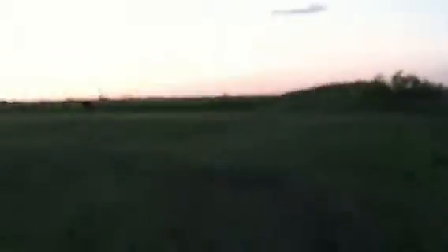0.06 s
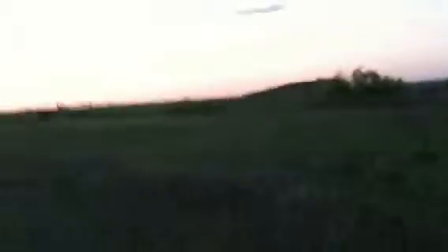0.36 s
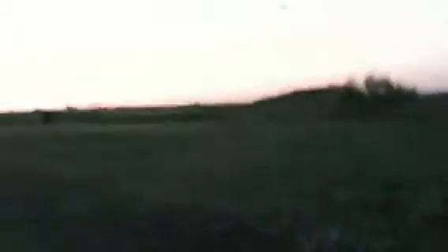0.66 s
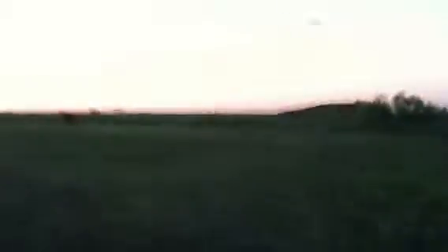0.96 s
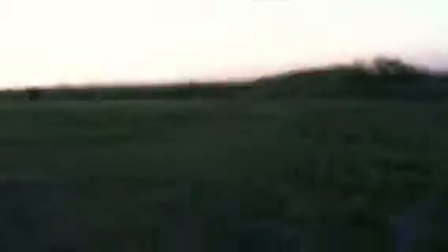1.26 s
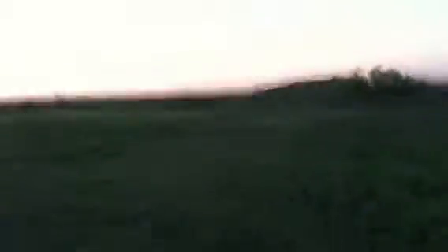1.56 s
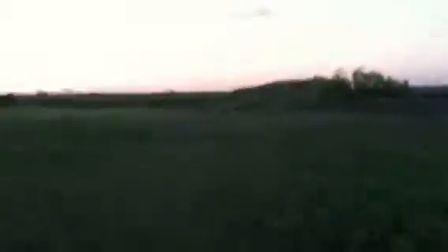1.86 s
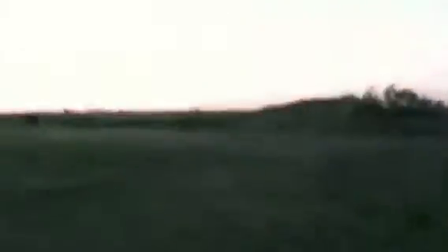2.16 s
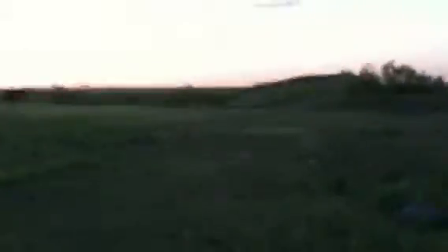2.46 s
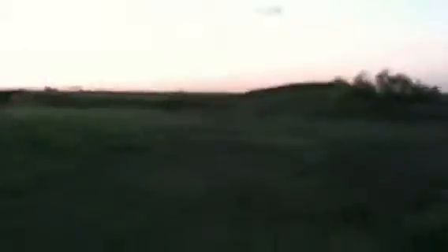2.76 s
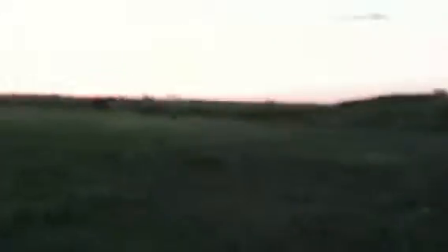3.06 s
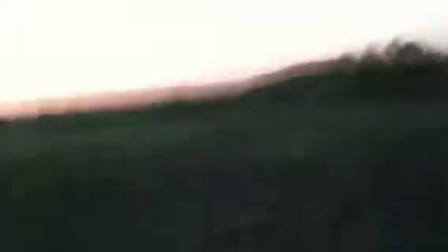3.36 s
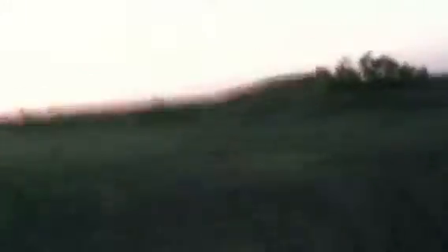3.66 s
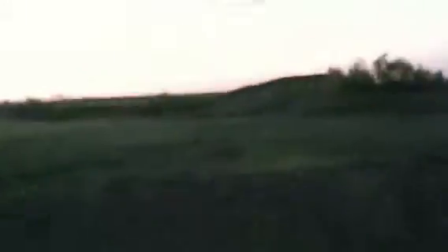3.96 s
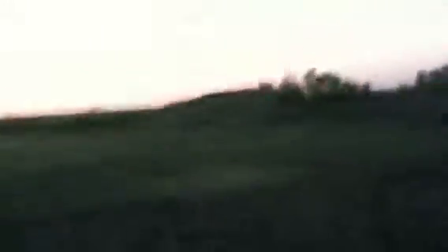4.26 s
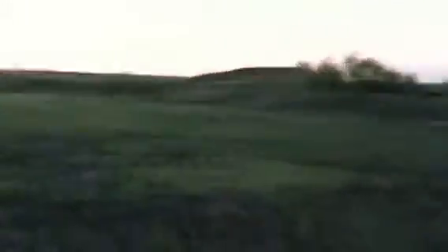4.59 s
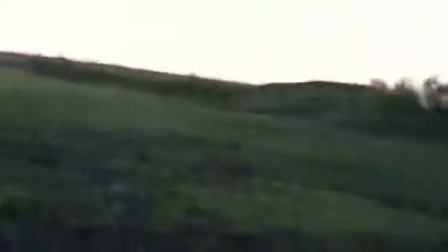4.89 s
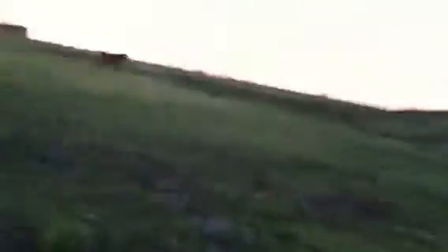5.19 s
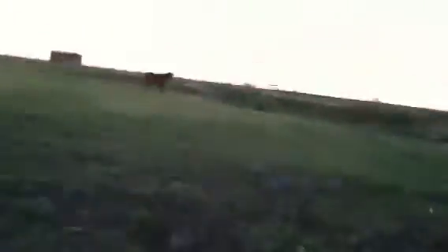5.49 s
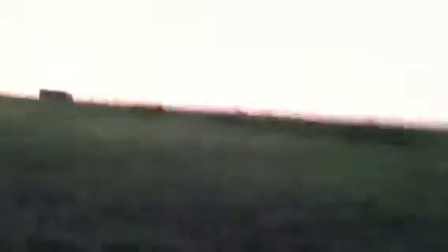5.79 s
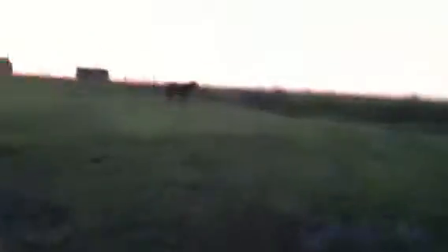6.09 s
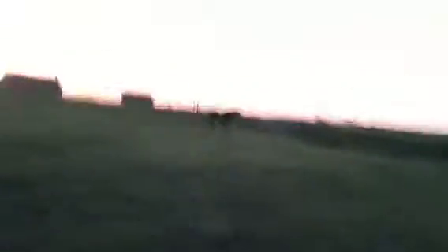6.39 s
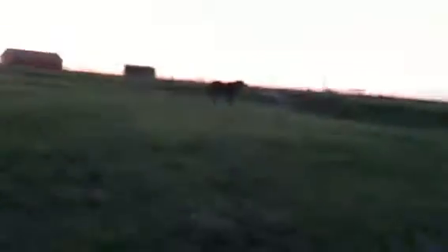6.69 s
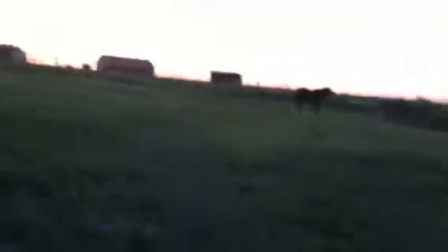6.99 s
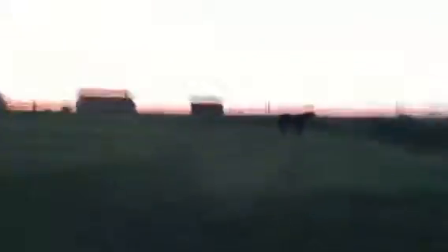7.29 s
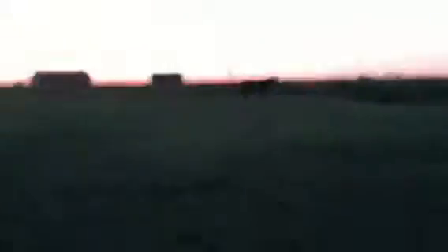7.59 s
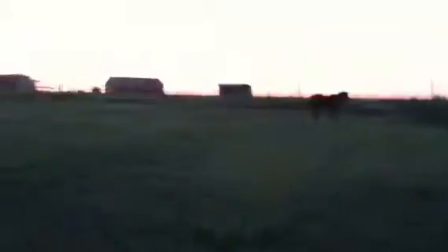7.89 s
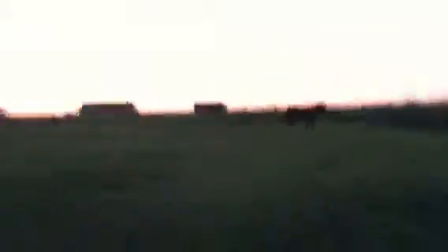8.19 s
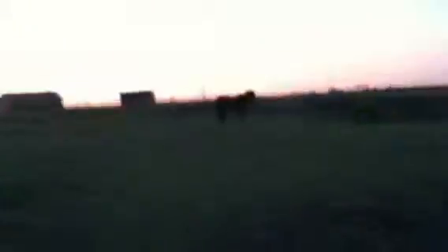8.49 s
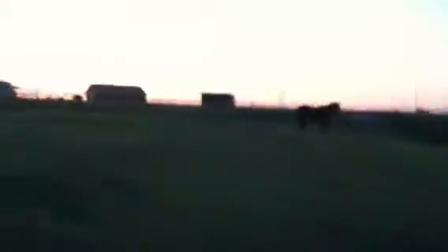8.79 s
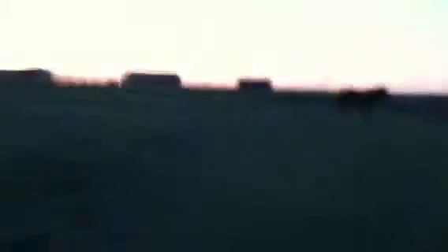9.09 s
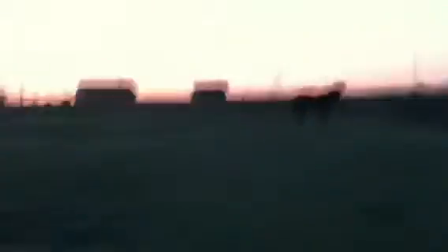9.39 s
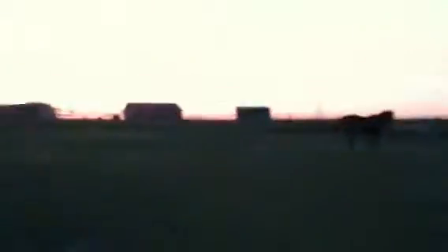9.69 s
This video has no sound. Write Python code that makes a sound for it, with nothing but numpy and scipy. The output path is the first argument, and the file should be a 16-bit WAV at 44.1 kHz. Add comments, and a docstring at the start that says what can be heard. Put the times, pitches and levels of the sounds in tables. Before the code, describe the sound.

Irregular plastic clacks and short, dull thumps run throughout as a bicycle jolts quickly across rough turf. A soft tyre rumble and light chain rattle lie beneath them, swelling a little before halfway. Some blows ring with a hollow knock, and one small metal part pings faintly shortly before the end. The microphone sits on the handlebar, so everything sounds close and dry, without echo.

```python
"""A mountain bike rides fast over bumpy grass, heard by a small camera on its handlebar. From the start the
tyres rustle and the chain jiggles, while each bump sets the springy mount swinging with a thump and throws its
loose plastic parts against their stops; about half the blows bounce back. After the first second, occasional
blows also ring a hollow note of the mount, each at its own pitch between about 800 and 1500 Hz. Near four
seconds the rolling grows a little louder, and near the end one small metal part pings."""
import sys
import numpy as np
from scipy import signal
from scipy.fft import rfft, irfft
from scipy.io import wavfile

SR = 44100
rng = np.random.default_rng(int(sys.argv[2]) if len(sys.argv) > 2 else 0)


def store_wav(level_fs):
    """Save 16-bit WAV to argv[1]."""
    pcm = np.round(np.clip(np.atleast_2d(level_fs), -1, 1) * 32767)
    wavfile.write(sys.argv[1], SR, pcm.T.astype(np.int16))


N = 434385

# Bumps in the ground. Each row: time in seconds, relative level of the loose parts' clack in dB,
# relative level of the mount's thump in dB.
BUMPS = [(0.038, -31.5, -27.5), (0.075, -20, -19), (0.208, -27.5, -30), (0.279, -30.5, -29),
         (0.317, -19.5, -24), (0.344, -38, -21.5), (0.387, -20.5, -17), (0.412, -25, -27),
         (0.448, -49, -20), (0.458, -26, -26), (0.518, -44, -20), (0.607, -34, -30), (0.645, -21, -15),
         (0.75, -32.5, -25), (0.824, -20.5, -24.5), (0.854, -26.5, -20.5), (0.931, -18.5, -19.5),
         (1.022, -29, -33), (1.039, -31.5, -28), (1.138, -23, -20), (1.162, -27.5, -26),
         (1.191, -59, -21.5), (1.206, -19.5, -16), (1.26, -36, -28), (1.39, -28.5, -30),
         (1.417, -20, -12.5), (1.466, -28, -29), (1.482, -34.5, -22), (1.687, -20, -16.5),
         (1.736, -34.5, -23.5), (1.821, -28.5, -31), (1.888, -41, -22.5), (1.911, -33.5, -30),
         (1.942, -24, -24), (1.97, -30, -27), (2.0, -26.5, -39), (2.01, -17, -19), (2.098, -31, -23.5),
         (2.199, -32, -23.5), (2.25, -19, -16.5), (2.349, -40, -40), (2.489, -27.5, -30),
         (2.513, -28.5, -26), (2.527, -34, -22), (2.584, -24.5, -27.5), (2.68, -36.5, -24.5),
         (2.704, -32.5, -25), (2.754, -35, -19.5), (2.777, -17.5, -12.5), (2.834, -18.5, -16.5),
         (2.907, -22.5, -17), (3.006, -25, -24), (3.047, -30.5, -37), (3.114, -35, -15), (3.14, -25, -21),
         (3.187, -30.5, -30), (3.232, -30, -20), (3.379, -30, -22.5), (3.509, -24, -28), (3.536, -20, -25),
         (3.548, -22, -13), (3.579, -15.5, -20), (3.674, -31, -28), (3.79, -22, -14.5), (3.847, -39, -13.5),
         (3.876, -28, -30), (3.902, -30, -28), (3.953, -17, -12), (4.006, -23, -16), (4.137, -23, -14.5),
         (4.156, -22, -12), (4.182, -26, -48), (4.249, -21, -15), (4.415, -28.5, -21.5), (4.448, -22, -27),
         (4.492, -21.5, -28), (4.53, -14.5, -11), (4.685, -37.5, -25), (4.801, -37, -17.5),
         (4.901, -27.5, -21.5), (4.933, -32.5, -30), (4.973, -25.5, -25), (5.011, -32, -26.5),
         (5.249, -38.5, -26), (5.454, -30.5, -29), (5.519, -34, -20), (5.549, -35, -19),
         (5.562, -23.5, -19), (5.724, -40.5, -23), (5.776, -31.5, -25), (5.832, -17, -12),
         (5.928, -53, -24), (6.016, -44, -18.5), (6.048, -24.5, -25), (6.099, -22, -34), (6.114, -53, -18),
         (6.135, -43, -34), (6.232, -32, -32), (6.282, -18.5, -15), (6.365, -35, -21.5), (6.468, -36, -26),
         (6.628, -26.5, -20.5), (6.655, -27, -31), (6.692, -19, -16.5), (6.763, -51, -24.5),
         (6.94, -18.5, -15.5), (7.009, -26, -28), (7.085, -31, -35), (7.308, -48, -19), (7.349, -51, -26),
         (7.417, -18, -11.5), (7.487, -45, -21), (7.667, -32, -27), (7.74, -35, -16.5), (7.76, -23, -27),
         (7.814, -30.5, -34), (7.851, -33, -31), (7.893, -30, -34), (7.912, -58, -22.5), (8.085, -28, -28),
         (8.099, -26, -17.5), (8.166, -39, -22), (8.277, -33.5, -28.5), (8.325, -28, -29),
         (8.35, -40, -21.5), (8.365, -28.5, -18), (8.433, -24.5, -23), (8.469, -27.5, -24.5),
         (8.655, -20, -23), (8.69, -21.5, -16.5), (8.73, -26.5, -24), (8.762, -17.5, -17.5),
         (8.803, -29, -36), (8.846, -20, -17), (8.889, -25.5, -24), (8.923, -24.5, -27),
         (8.969, -22.5, -25), (8.999, -47, -18), (9.012, -19, -19), (9.255, -15.5, -9.5),
         (9.349, -33.5, -25), (9.519, -47, -24), (9.576, -23.5, -26), (9.59, -23, -17.5),
         (9.702, -30, -26.5), (9.742, -24.5, -30), (9.758, -50, -19)]
USUAL_DB = -24  # the clack of a middling blow
KNOCK_HZ, CLACK_HZ, EDGE_HZ, RAP_HZ = (330, 1200), (1200, 3600), (4000, 14000), (330, 3600)
CUTOFF_HZ = 15700


def jolts(rebound_share=0.55, min_flight_s=0.015, mean_extra_s=0.012):
    """Inelastic rebound: after some bumps the loose parts fly back and land again, more softly."""
    s, clack_db, _ = np.transpose(BUMPS)
    chance, flight = rng.random((len(s), 2)).T
    landing_s = s + min_flight_s - mean_extra_s * np.log(1 - flight)
    strength_db = 0.29 * (clack_db - USUAL_DB) + 2.4 * rng.standard_normal(len(s))
    rebounds = np.c_[landing_s, strength_db - 36, strength_db - 35]  # columns as in BUMPS
    return np.r_[BUMPS, rebounds[chance < rebound_share]]


def clacks(s, db, scrape_lead_s=0.0051):
    """Impact noise: plastic hits its stop with a knock, a clack and an edge; harder blows are brighter."""
    knock_scatter, edge_scatter, scrape_scatter = rng.standard_normal((len(s), 3)).T
    knock_db = -24 + 0.5 * (db - USUAL_DB) + knock_scatter
    edge_db = -37 + 1.124 * (db - USUAL_DB) + edge_scatter
    scrape_db = db - 25 + 5 * scrape_scatter  # some parts scrape just before they land
    knock = strikes(KNOCK_HZ, knock_db, decay_s=0.0052, tail_db=-17.5, tail_s=0.0098,
                    grain_db=3.5, snap=3.8)
    clack = strikes(CLACK_HZ, db + 1, decay_s=0.0046, tail_db=-13, tail_s=0.0089, grain_db=6.5, snap=11.2)
    edge = strikes(EDGE_HZ, edge_db, decay_s=0.01, tail_db=0.5, tail_s=0.011, grain_db=6.5, snap=4.6)
    scrape = strikes(RAP_HZ, scrape_db, decay_s=0.0027, tail_db=-23, tail_s=0.01, grain_db=-1, snap=0)
    return placed(s, knock + clack + edge) + placed(s - scrape_lead_s, scrape)


def strikes(edges_hz, levels_db, decay_s, tail_db, tail_s, grain_db, snap=6, stick_s=0.012):
    """Contact excitation, one row a blow: faces snap together, chatter until they stick, and ring on."""
    t = np.arange(3500) / SR
    contact, grain, after = rng.standard_normal((len(levels_db), 3, len(t))).transpose(1, 0, 2)
    dying = np.exp(-t / decay_s - (t / stick_s) ** 2)
    chatter = unit_rms(contact * gain_of(grain_db * grain)) * dying + snap * (t == 0)
    tail = shell(after * np.exp(-t / tail_s))  # passes the resonances twice, so it is more hollow
    blow = unit_onsets(band(shell(chatter, spot_db=2.5), edges_hz))
    ring = unit_onsets(band(shell(tail, spot_db=2.5), edges_hz))
    return gain_of(levels_db)[:, None] * (blow + gain_of(tail_db) * ring)


def shell(drive, spot_db=0, top_hz=10600):
    """Modal resonance of the plastic: each row strikes another spot, weighting the modes by spot_db."""
    # Modes of the mount and camera shell. Each row: frequency in Hz, bandwidth in Hz, relative gain in dB.
    modes = [(315, 126, 0), (436, 317, 1), (730, 332, -0.5), (1020, 183, -3), (1428, 354, -4.5),
             (1985, 377, -4), (2656, 382, -5), (3078, 760, -10.5), (4597, 530, -16.5), (6570, 2400, -20),
             (8250, 2030, -14.5), (8860, 1710, -18)]
    weights = gain_of(spot_db * rng.standard_normal((len(drive), len(modes))))
    ring = 0
    for k, (hz, width_hz, db) in enumerate(modes):
        response = signal.lfilter(*signal.iirpeak(hz, hz / width_hz, SR), drive)
        ring += (-1) ** k * gain_of(db) * weights[:, k, None] * response
    return signal.sosfilt(signal.butter(5, top_hz, fs=SR, output="sos"), ring)


def thumps(s, db, clack_db, rest_hz=177.7, soft_hz=221.4, stiff_hz=302, swell_s=0.0025, settle_s=0.0081):
    """A nonlinear spring: a bump stiffens the mount, which swings down to its note as the clamp rubs."""
    t = np.arange(3000) / SR
    slowness, detune = rng.standard_normal((len(s), 2)).T
    stiffening_hz = 5 * (clack_db - db + 5)  # more clack for the same thump starts the swing higher
    start_hz = np.clip(soft_hz + stiffening_hz, soft_hz, stiff_hz) * np.exp(0.051 * detune)
    pitch_hz = rest_hz + (start_hz[:, None] - rest_hz) * np.exp(-(t / settle_s) ** 2)
    phase = 2 * np.pi * np.cumsum(pitch_hz, 1) / SR
    swell = t / (swell_s * np.exp(0.1 * slowness[:, None]))
    lingering = gain_of(-19) * (1 - np.exp(-swell)) * np.exp(-t / 0.0063)
    envelope = swell * np.exp(1 - swell) + lingering
    swings = -np.sqrt(2) * gain_of(db + 5.5)[:, None] * envelope * np.sin(phase)
    rubs = strikes((280, 1800), db - 14, decay_s=0.0027, tail_db=-8, tail_s=0.009, grain_db=4.5)
    motion = placed(s, swings) + lifts(s, db)
    bass_cut = signal.butter(1, 95, "high", fs=SR, output="sos")  # the thumps carry little deep bass
    return signal.sosfiltfilt(bass_cut, motion) + placed(s, rubs)


def lifts(s, db, deep_db=-9, lead_s=0.01606, swell_s=0.0025, lift_hz=210):
    """Damped oscillation: just ahead of a deep bump the mount rises with one soft swing and no clack."""
    t = np.arange(1500) / SR
    envelope = t / swell_s * np.exp(1 - t / swell_s)
    swing = -np.sqrt(2) * envelope * np.sin(2 * np.pi * lift_hz * t)
    lift_db = -9 + 3.6 * np.minimum(db - deep_db, 0)  # shallow bumps barely lift it
    return placed(s - lead_s, gain_of(lift_db)[:, None] * swing)


def tocks(relative_half_width=0.1283):
    """Narrow-band resonance: some blows ring a hollow note of the mount, each at its own pitch, inside a short,
    broad rap."""
    # Blows that ring the mount. Each row: time in seconds, relative level in dB, pitch in Hz.
    blows = [(1.209, -22, 985), (1.467, -21.5, 1420), (1.504, -25.5, 1020), (1.911, -21.5, 840),
             (2.035, -18.5, 1470), (3.88, -18.5, 825), (4.429, -28, 810), (4.556, -28.5, 830),
             (4.83, -24.5, 1020), (6.396, -27, 1020), (6.785, -30, 990), (7.417, -18, 1030),
             (7.944, -28, 1020), (8.111, -25.5, 990), (8.51, -32, 1020), (9.589, -22, 880)]
    s, db, _ = np.transpose(blows)
    raps = strikes(RAP_HZ, db - 5, decay_s=0.0064, tail_db=-28, tail_s=0.0096, grain_db=2)
    out = placed(s, raps)
    for at_s, level_db, hz in blows:
        half_width_hz = hz * relative_half_width
        build_s = 1 / (np.pi * half_width_hz)  # a narrower resonance builds more slowly
        note = strikes((hz - half_width_hz, hz + half_width_hz), [level_db - 1],
                       decay_s=0.0028, tail_db=-35, tail_s=0.0096, grain_db=8, snap=14)[0]
        add(out, at_s - build_s, note)
    return out


def ping(start_s=9.3208, onset_s=0.00041):
    """Free vibration: the inharmonic modes of a small metal part die away, each at its own rate."""
    # The part's modes. Each row: frequency in Hz, relative level in dB, time to fall 60 dB in seconds.
    partials = [(4662, -16, .066), (5647, -8, .14), (7025, 0, .08), (8726, -15, .034), (10730, -22, .051)]
    t = np.arange(SR // 5) / SR
    ring = sum(gain_of(db - 60 * t / t60) * np.sin(2 * np.pi * hz * t) for hz, db, t60 in partials)
    attack = 1 - np.exp(-t / onset_s)
    return placed([start_s], [gain_of(-31.5) * attack * ring])


def rolling():
    """Rolling noise: tyres, fork and chain rise and fall together with how hard the tyres work."""
    # The tyres' effort on the turf. Each row: time in seconds, gain in dB.
    effort = [(0.0, -42), (3.07, -40.5), (3.4, -41), (3.73, -38), (8.36, -40), (8.83, -38.5), (9.19, -41.5),
              (9.85, -39.5)]
    s, db = np.transpose(effort)
    gain = gain_of(np.interp(np.arange(N) / SR, s, db))
    tufts = gain_of(-4) * jiggle((150, 1000), per_s=60, decay_s=0.0043)  # small bumps through the fork
    chain = gain_of(-8) * jiggle((600, 9000), per_s=45, decay_s=0.0093)
    return gain * (tyres() + shaking() * (tufts + chain))


def tyres(lump_db=5.5, lumps_per_s=60):
    """Roughness excitation: the tyres rumble and swish on the turf, swelling over each tuft."""
    # Spectrum of tyres on turf. Each row: frequency in Hz, relative spectral density in dB.
    spectrum = [(25, -25), (65, -30), (150, 1), (215, 0.5), (450, -5.5), (700, -12), (1200, -28),
                (2900, -23.5), (3800, -35), (5400, -35), (7700, -36), (9600, -45), (14000, -70)]
    hz, db = np.transpose(spectrum)
    colour_db = np.interp(np.log(np.fft.rfftfreq(N, 1 / SR) + 1), np.log(hz), db)
    swish = unit_rms(irfft(rfft(rng.standard_normal(N)) * gain_of(colour_db), N))
    return gain_of(-1 + lump_db * wander(lumps_per_s)) * swish


def jiggle(edges_hz, per_s, decay_s, range_db=13):
    """Shot noise: light taps of many sizes excite the shell at uneven intervals."""
    tap_count = np.floor(np.cumsum(per_s * np.exp(wander(per_s) / 2)) / SR)
    taps = np.diff(tap_count, prepend=0) * gain_of(-range_db * rng.random(N))
    envelope = signal.lfilter([1], [1, -np.exp(-1 / (decay_s * SR))], taps + 1e-12)
    bursts = envelope * rng.standard_normal(N)
    return unit_rms(band(shell(bursts[None])[0], edges_hz, order=2))


def shaking(rise_s=0.02, calm_s=0.0078, floor=0.76, lead_s=0.011):
    """Transient response: the bike's shaking builds as a wheel meets a bump and calms down after it."""
    t = np.arange(SR // 2) / SR
    s, clack_db, _ = np.transpose(BUMPS)
    surge = (1 - np.exp(-(t / rise_s) ** 2)) * np.exp(-t / calm_s)
    surges = np.sqrt(gain_of(clack_db))[:, None] * surge
    return floor + unit_rms(placed(s - lead_s, surges))


def wander(per_s):
    """Linear interpolation between random values gives a drift of rms 1."""
    knots = rng.standard_normal(int(N / SR * per_s) + 2)
    return unit_rms(np.interp(np.arange(N) / SR * per_s, np.arange(len(knots)), knots))


def band(x, edges_hz, order=3):
    """Band-pass filtering keeps what lies between two edges."""
    return signal.sosfilt(signal.butter(order, edges_hz, "band", fs=SR, output="sos"), x)


def gain_of(db):
    """The decibel scale: 20 dB is a factor of ten in amplitude."""
    return 10 ** (np.asarray(db) / 20)


def unit_rms(x):
    """Normalisation to rms 1."""
    return x / np.sqrt(np.mean(x ** 2) + 1e-20)


def unit_onsets(rows):
    """Normalisation of each row to rms 1 over its first 10 ms."""
    return rows / np.sqrt(np.mean(rows[:, :SR // 100] ** 2, axis=1, keepdims=True))


def add(mix, s, sound):
    """Superposition of one sound on the mix at s seconds."""
    part = mix[max(round(s * SR), 0):][:len(sound)]
    part += sound[:len(part)]


def placed(times, sounds):
    """Superposition of sounds, each at its own time."""
    out = np.zeros(N)
    for s, sound in zip(times, sounds):
        add(out, s, sound)
    return out


def scene():
    """Structure-borne sound: everything reaches the camera through the handlebar, with no room echo."""
    background = rolling()
    s, clack_db, thump_db = jolts().T
    return (background + tocks() + ping() + clacks(s, clack_db) + thumps(s, thump_db, clack_db))[None]


def record(dry, ceiling=0.75, dull_hz=12000):
    """Saturation flattens the hardest blows; low-pass filters dull the top octave and limit the band."""
    held = dry / (1 + (dry / ceiling) ** 8) ** (1 / 8)
    dull = signal.sosfilt(signal.butter(3, dull_hz, fs=SR, output="sos"), held)
    band_limit = signal.firwin(255, CUTOFF_HZ, window=("kaiser", 9), fs=SR)
    return signal.oaconvolve(dull, band_limit[None], "same")


dry = scene()
out = record(dry)
store_wav(out)
```